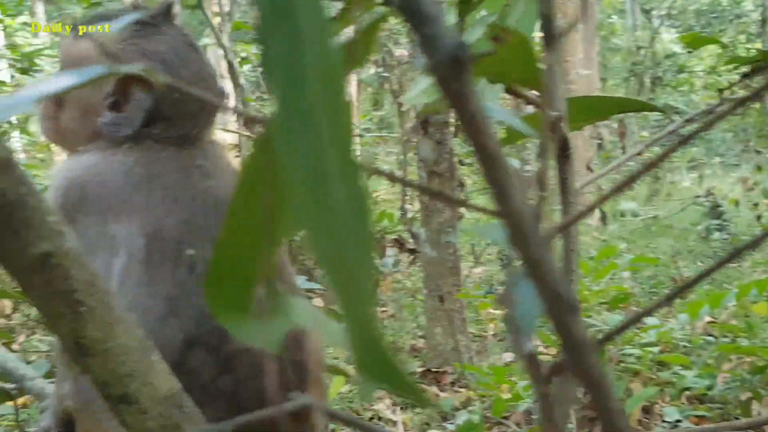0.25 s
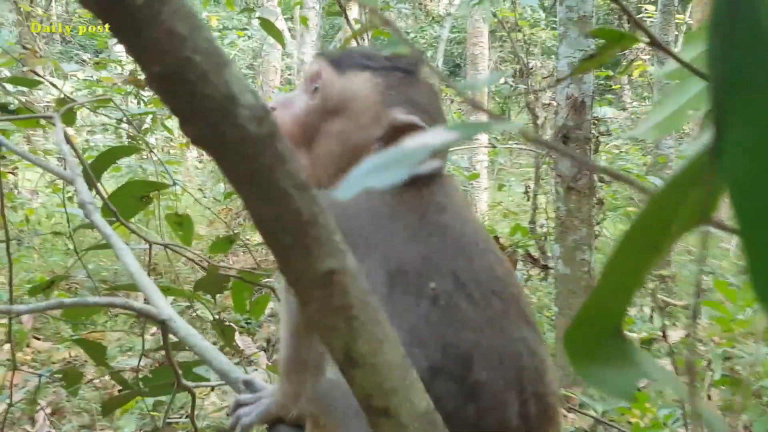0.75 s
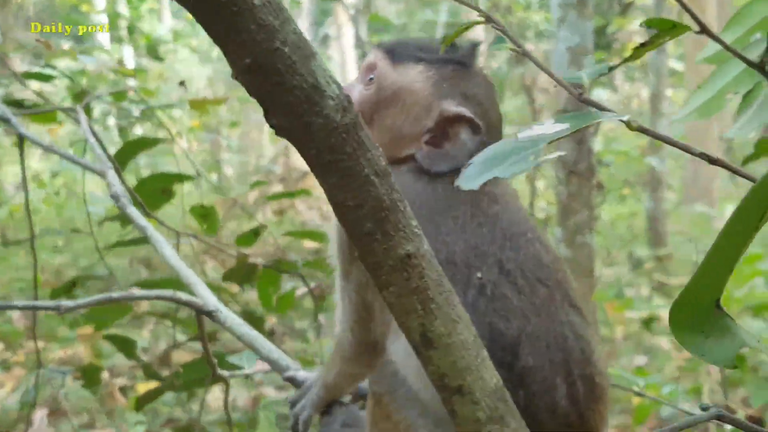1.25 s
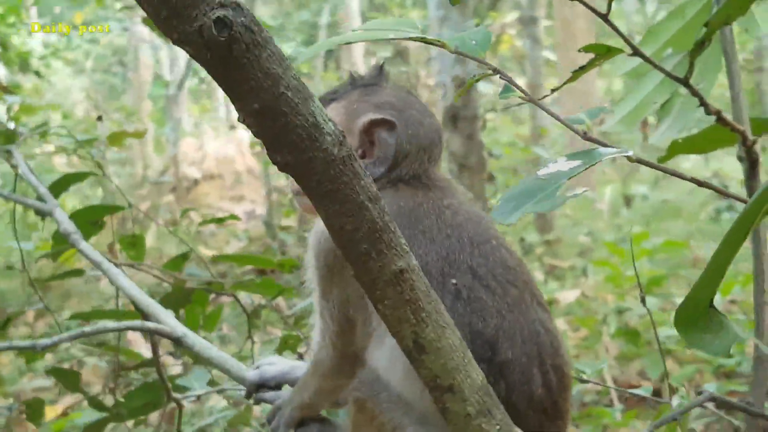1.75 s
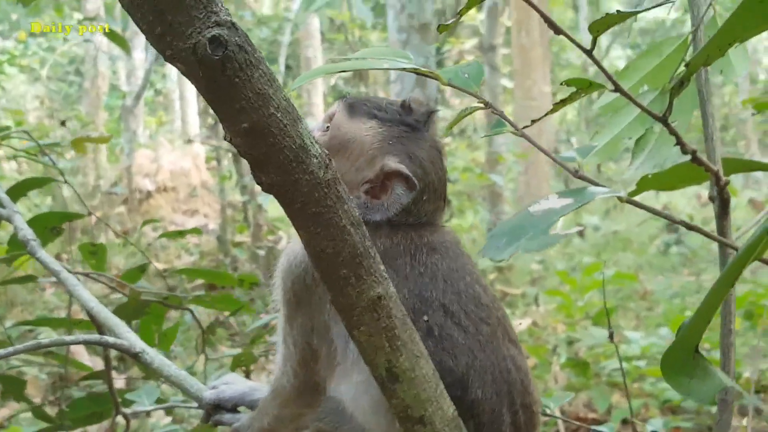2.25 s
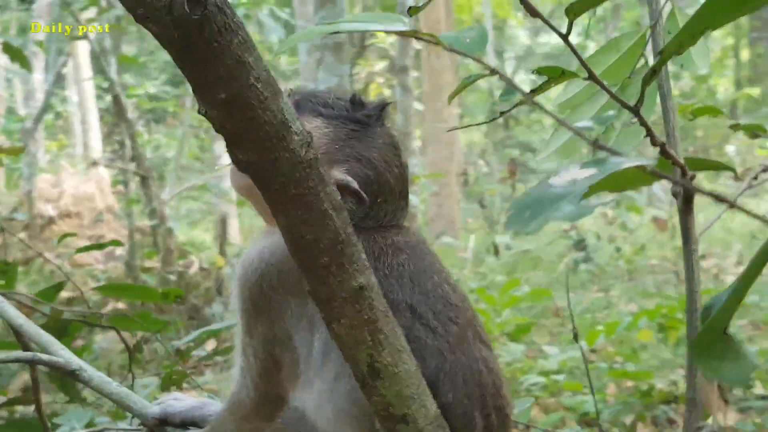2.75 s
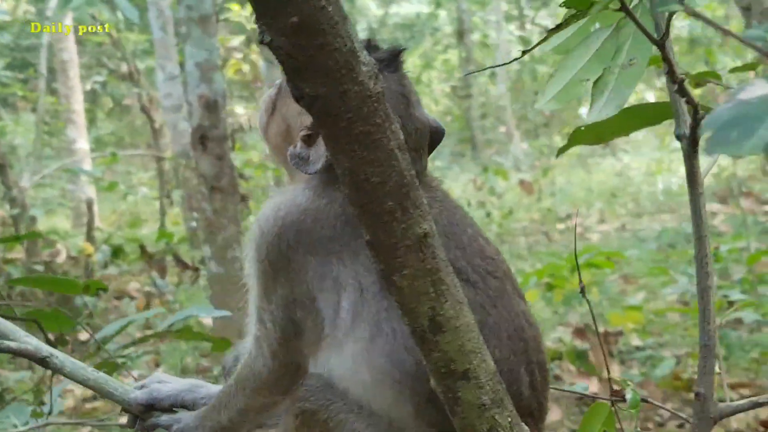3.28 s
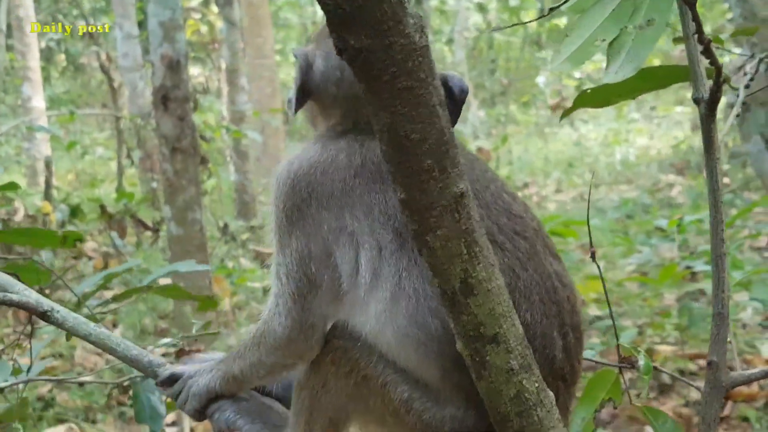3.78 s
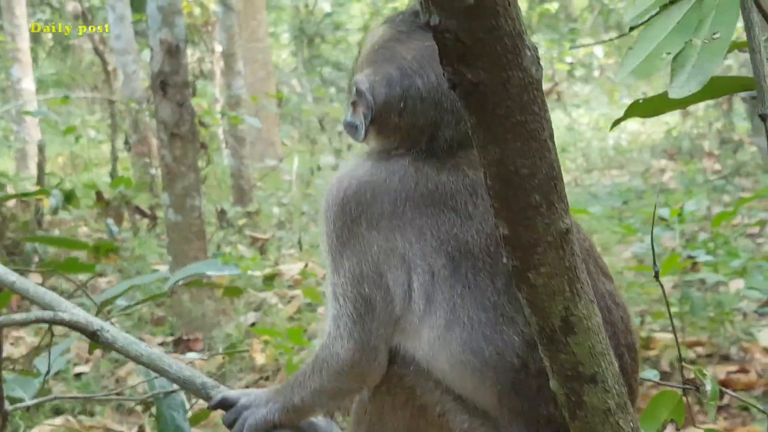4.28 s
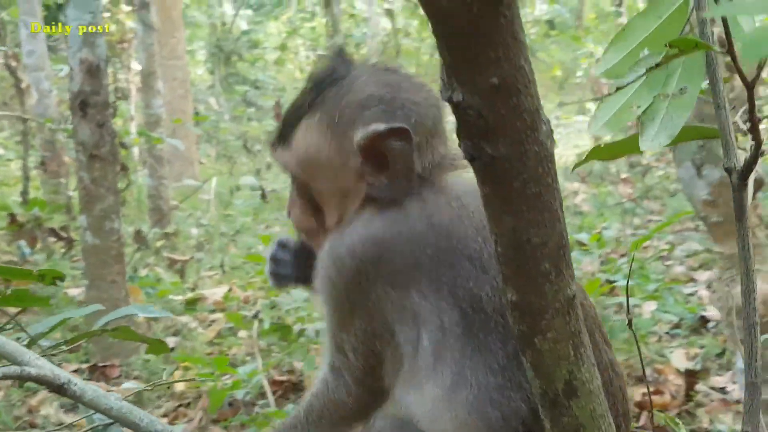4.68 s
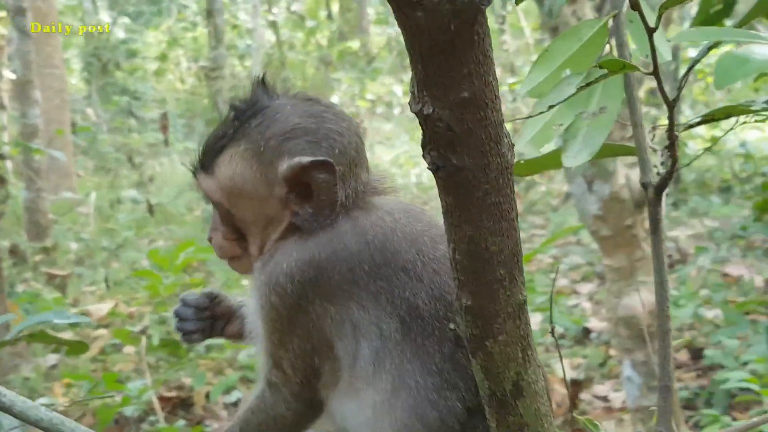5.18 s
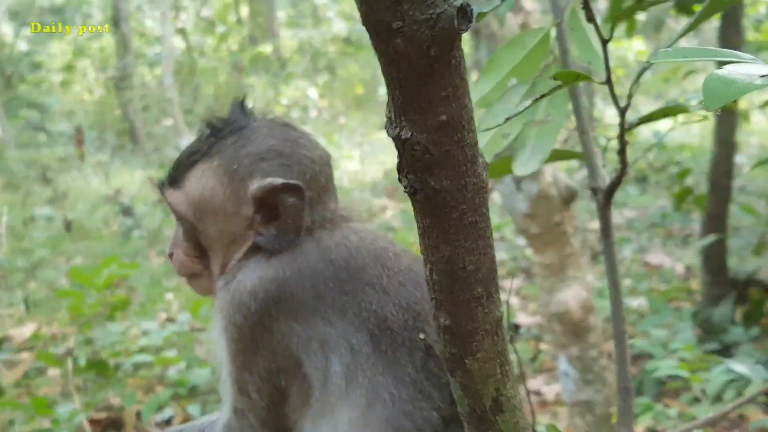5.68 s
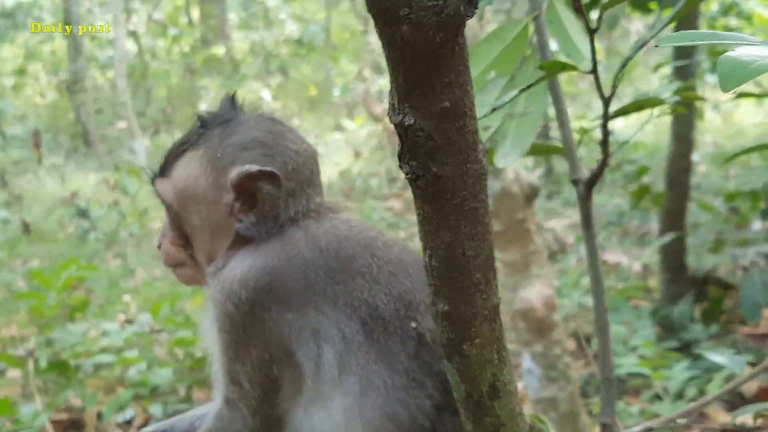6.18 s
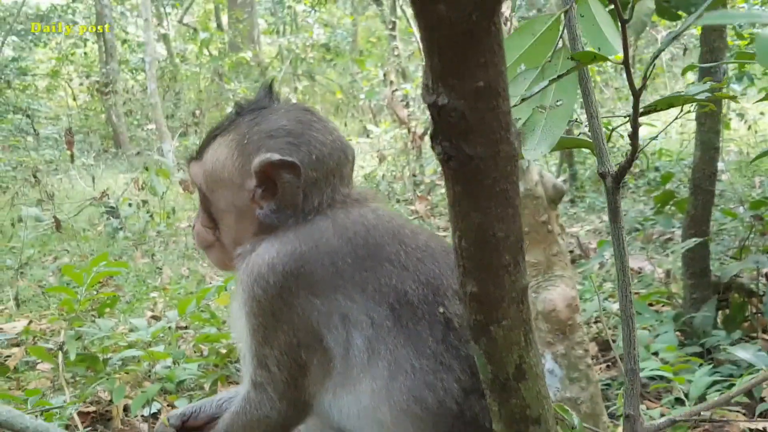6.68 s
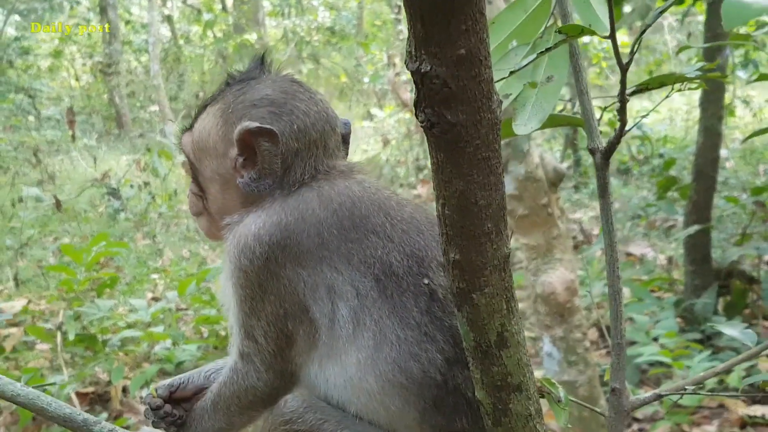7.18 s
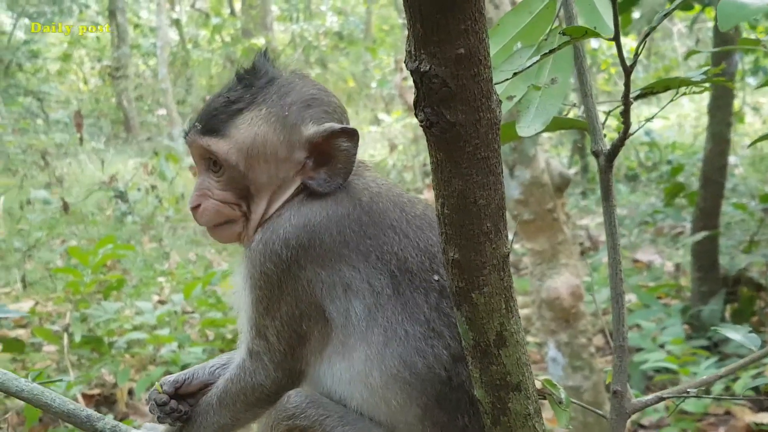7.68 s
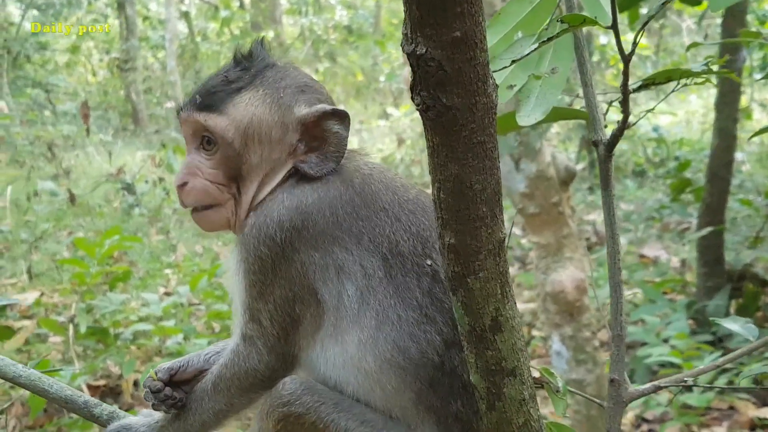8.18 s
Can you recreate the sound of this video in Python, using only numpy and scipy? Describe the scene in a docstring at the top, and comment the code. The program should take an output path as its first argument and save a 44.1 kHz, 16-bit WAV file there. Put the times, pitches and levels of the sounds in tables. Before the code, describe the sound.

Outdoors in woodland where a young monkey sits quietly, a continuous shrill insect whine dominates. Small dry leaf scuffs and ticks come close to the microphone in clusters, growing busiest around four seconds, when a twig breaks with a sharp bright crack and tiny woody knock. Afterwards the litter quietens to a few soft crackles. Low far rumble and thin airy hiss sit underneath; the monkey makes no call.

```python
"""A chorus of cicadas whines in a forest canopy around a small hand-held camera with two sound ports.
Each buckle of their drums gives five clicks, so every fifth overtone is strong; trunks scatter the song.
A far low rumble and a faint hiss of air are shaped noise. Dry leaves rustle close by as dense random
clicks and crack as short damped rings; once, a twig snaps with a bright burst and a woody knock."""
import sys
import numpy as np
from scipy import signal
from scipy.fft import rfft, irfft, next_fast_len
from scipy.io import wavfile
from scipy.ndimage import uniform_filter1d

SR = 44100
rng = np.random.default_rng(int(sys.argv[2]) if len(sys.argv) > 2 else 0)


def generate_wav(sig):
    """Save sig (samples, or channels by samples) to the path in sys.argv[1] as 16-bit PCM at SR."""
    pcm = np.round(np.clip(np.atleast_2d(sig).T, -1, 1) * 32767).astype(np.int16)
    wavfile.write(sys.argv[1], SR, pcm)


N = 372644


def undb(db):
    """Decibel law: amplitude gain of a level in dB."""
    return 10 ** (np.asarray(db) / 20)


def unit(x):
    """Power normalization: scale to rms 1."""
    return x / np.sqrt(np.mean(x ** 2))


def colour(x, points, scale=1):
    """Linear filtering: a gain curve through (Hz, dB) points joined on a log frequency axis."""
    size = next_fast_len(x.shape[-1])
    hz, db = np.transpose(points)
    bin_hz = np.arange(size // 2 + 1) * SR / size
    log_hz = np.log(np.maximum(bin_hz, 1))
    gain = undb(scale * np.interp(log_hz, np.log(hz), db))
    return irfft(rfft(x, size) * gain, size)[..., :x.shape[-1]]


def curves(table):
    """Linear interpolation: each column of a timed table, one value a sample."""
    time_s, *columns = np.transpose(table)
    return [np.interp(np.arange(N) / SR, time_s, column) for column in columns]


def walk(rate_hz, size=N):
    """Low-passed chance: a smooth random curve of rms 1 that turns about rate_hz times a second."""
    width = max(int(SR / rate_hz), 2)
    smooth = uniform_filter1d(rng.standard_normal(size), width)
    return unit(uniform_filter1d(smooth, width))


def scatter(x, t60_s, pair):
    """Diffuse scattering: echoes form an exponentially fading noise tail, separate for each port."""
    t = np.arange(pair.shape[1]) / SR
    tail = pair * np.exp(-np.log(1000) * t / t60_s)
    energy = np.sum(tail[0] ** 2)
    return signal.fftconvolve(x[None], tail / np.sqrt(energy), axes=1)


BUCKLE_HZ = 542.3
# Overtones of the buckling drums; half multiples come from the two drums taking turns.
# Columns: multiple [of BUCKLE_HZ], level_db [dB]
OVERTONES = [(3, -89), (4, -64.5), (4.5, -81), (5, -36.5), (5.5, -60.5), (6, -58.5), (6.5, -70.5), (7, -69),
             (8, -66), (9, -61), (10, -36.5), (11, -55), (11.5, -65), (12, -61), (12.5, -70), (13, -61.5),
             (14, -58), (14.5, -57), (15, -42.5), (16, -58), (16.5, -71), (17, -61), (17.5, -80),
             (18, -66.5), (19, -56), (19.5, -60), (20, -42), (21, -57), (21.5, -70), (22, -60), (22.5, -70),
             (23, -60.5), (24, -66), (25, -55), (26, -70), (27, -64), (28, -67), (29, -72)]
# The chorus as the camera turns.
# Columns: time_s [s], level_db [dB], lowest_ring_db [dB], left_minus_right_db [dB], raggedness_db [dB]
CHORUS_COURSE = [(0, -0.5, 0.5, -0.5, -0.5), (1.2, -0.5, 0.5, 2.5, -1), (2.5, -0.5, 1, 1, 1),
                 (3.6, -1.5, 1.5, 0.5, 1.5), (4.8, -2, 1, -0.5, 2.5), (6, -1.5, 2, 0.5, 2.5),
                 (7, -2, -0.5, 0.5, 4.5), (8.45, -2.5, 0, 1.5, 4)]


def cicadas(count=10):
    """Harmonic synthesis with phase modulation: detuned singers waver, flutter and slip between buckles."""
    lead = SR // 2  # half a second of song beforehand, so echoes are already running at the start
    size = N + lead
    turn = np.linspace(0, 2, 4097)  # two buckles make one full period of the half multiples
    choir, power = 0, 0
    level_db, low_db, pan_db, ragged_db = curves(CHORUS_COURSE)
    ragged = np.pad(undb(ragged_db), (lead, 0), "edge")
    for place in np.linspace(-1, 1, count):
        shape = sum(undb(db) * np.sin(2 * np.pi * (k * turn + rng.random())) for k, db in OVERTONES)
        # singers far from the common pitch are faint
        near = undb(-14 * abs(place))
        tune = 1 + .011 * place + .003 * place ** 2 + .003 * walk(15, size)
        slip = ragged * walk(612, size)
        # phase counts buckles
        phase = np.cumsum(BUCKLE_HZ * tune) / SR
        phase += 0.0022 * slip + 0.0013 * walk(220, size)
        # a buckle that drags is flatter and louder, which fills the low side of each line
        push = 1 - 0.078 * unit(np.gradient(slip))
        push += 0.28 * ragged * walk(425, size) + 0.28 * walk(53, size)
        song = near * push * np.interp(phase % 2, turn, shape)
        # every singer sits on its own tree, so its echoes are its own
        echoes = scatter(song, 0.66, rng.standard_normal((2, lead)))
        choir = choir + echoes[:, lead:size]
        power += near ** 2
    choir = choir * np.sqrt(2 / power)
    lowest_ring = colour(choir, [(3600, 0), (4400, -80)])
    balanced = choir + (undb(low_db) - 1) * lowest_ring
    return balanced * undb(level_db + np.array([pan_db, -pan_db]) / 2)


# Spectrum of the far rumble and hiss. Columns: frequency_hz [Hz], density_db [dB per Hz, relative]
AIR_SPECTRUM = [(15, -34), (32, -4), (45, -1), (55, 0), (146, -6.5), (250, -18), (330, -18), (700, -20.5),
                (1300, -31), (1700, -19.5), (2000, -29), (4000, -31), (9000, -65), (16000, -58)]
# Stereo width of the air. Columns: frequency_hz [Hz], side_minus_mid_db [dB]
AIR_WIDTH = [(60, -19), (110, -18.5), (200, -7), (380, -5.5), (700, -1.5), (1290, 6), (2380, -2),
             (4400, -1), (8120, -21), (15000, -16)]
AIR_DB = -52.5  # rms over both ports, before the camera body shades them


def air():
    """Partial coherence: shared mid and opposed side noise make rumble and hiss; the bass is nearly mono."""
    mid, side = rng.standard_normal((2, N))
    side = colour(side, AIR_WIDTH)
    ports = np.array([mid + side, mid - side])
    return unit(colour(ports, AIR_SPECTRUM)) * undb(AIR_DB)


# Leaves on the move. Columns: start_s [s], hold_s [s], level_db [dB]
RUSTLE_EVENTS = [(0.254, 0.033, -55), (0.367, 0.063, -52.5), (0.5, 0.026, -47.5), (.59, 0.044, -51),
                 (0.671, 0.076, -42.5), (.78, 0.095, -46), (.92, .06, -55), (1.255, 0.13, -59),
                 (2.015, 0.17, -53), (2.552, .03, -49), (2.613, 0.059, -40.5), (2.714, 0.042, -43.5),
                 (2.81, 0.058, -42.5), (2.9, .04, -48), (3.035, 0.064, -52.5), (3.2, 0.057, -52.5),
                 (3.28, 0.099, -48.5), (3.498, 0.013, -49), (3.648, 0.085, -55.5), (3.89, 0.067, -50),
                 (4.006, 0.099, -51.5), (4.13, 0.038, -45.5), (4.202, 0.046, -40.5), (4.28, 0.018, -42),
                 (4.341, 0.025, -38), (4.435, 0.016, -41.5), (4.47, 0.058, -48), (4.56, 0.054, -54),
                 (4.787, 0.14, -52), (5.14, .05, -55), (6.043, 0.038, -53), (6.165, 0.13, -48.5),
                 (6.338, 0.067, -53.5), (6.526, 0.017, -51.5)]
RISE_DB_PER_S, FALL_DB_PER_S = 292, 450
STIR_DB = -63  # the litter never rests fully


def motion():
    """Incoherent addition: rustles swell, hold and fade evenly in dB, and their powers add."""
    t = np.arange(N) / SR
    power = undb(STIR_DB) ** 2
    for start_s, hold_s, level_db in RUSTLE_EVENTS:
        rise_db = RISE_DB_PER_S * np.maximum(start_s - t, 0)
        fall_db = FALL_DB_PER_S * np.maximum(t - start_s - hold_s, 0)
        power = power + undb(level_db - rise_db - fall_db) ** 2
    return np.sqrt(power)


# Spectrum of dry leaves. Columns: frequency_hz [Hz], density_db [dB per Hz, relative]
LEAF_SPECTRUM = [(150, -13), (300, -10), (600, -4), (1050, -1), (1600, 0), (2300, -2), (4400, -6.5),
                 (8000, -1.5), (15000, -35)]
# Single leaf cracks. Columns: start_s [s], level_db [dB], ring_hz [Hz], treble_db [dB relative to level_db]
LEAF_CRACKS = [(0.018, -38, 1900, -6), (0.427, -38, 1210, -18), (0.498, -40, 970, -20),
               (0.654, -34, 1670, -10), (.8, -46, 2000, 14), (0.811, -28, 1170, -17),
               (1.021, -46, 1410, -18), (2.022, -37.5, 1530, -19), (2.594, -34.5, 1590, -17),
               (2.633, -29, 1570, -17), (2.811, -35, 1690, -21), (2.837, -31, 1580, -7),
               (2.868, -30, 1270, -23), (3.022, -34.5, 1640, -21), (3.093, -37.5, 920, -15),
               (3.226, -40, 1500, -20), (3.297, -33, 1700, -24), (3.439, -36, 1780, -19),
               (4.201, -33, 1550, -19), (4.235, -33, 1480, -19), (4.248, -27, 1810, -21),
               (4.287, -35, 1690, -20), (4.343, -25, 1690, -10.5), (4.363, -31, 1160, -22),
               (4.424, -30, 1570, -28), (4.88, -39, 1630, -18), (5.41, -48, 1490, -18),
               (6.236, -38, 1210, -18), (6.26, -31, 1640, -22), (6.434, -35, 1720, -27),
               (6.722, -39.5, 1780, -23), (6.748, -40, 1800, -16), (6.919, -48, 1200, -18),
               (7.346, -41, 999, -17)]


def leaves():
    """Shot noise and damped resonance: each leaf size clicks in its own range over hiss; cracks ring."""
    near = 0
    for hz in (200, 400, 800, 1600, 3200, 6400, 12800):
        hits = rng.random(N) < 1800 / SR  # 1800 clicks a second on average
        strength = undb(1.7 * np.minimum(rng.exponential(size=N), 3))
        grains = hits * rng.standard_normal(N) * strength
        hiss = 0.76 * rng.standard_normal(N)
        clicks = (unit(grains) + hiss) * undb(3.3 * walk(44))
        band = [(hz / 3, -40), (hz / 1.8, -9), (hz / 1.41, -3), (hz, 0),
                (hz * 1.41, -3), (hz * 1.8, -9), (hz * 3, -40)]
        near = near + colour(clicks, band)
    near = unit(colour(near, LEAF_SPECTRUM)) * motion()
    t = np.arange(1024) / SR
    noises = rng.standard_normal((len(LEAF_CRACKS), len(t)))
    for (start_s, level_db, ring_hz, treble_db), noise in zip(LEAF_CRACKS, noises):
        ring = np.sin(2 * np.pi * ring_hz * t) * np.exp(-t / 0.0055) * np.tanh(t / 0.0006)
        rasp = unit(colour(noise, LEAF_SPECTRUM)) * np.exp(-t / 0.0051)
        tick = unit(colour(noise, [(2500, -35), (3400, -9), (5000, 13), (9000, -22)]))
        tick = tick * np.exp(-t / 0.0066)
        crack = .5 * ring + .5 * rasp + undb(treble_db) * tick
        start = int(start_s * SR)
        near[start:start + len(t)] += undb(level_db) * crack
    return near


# The breaks of one snapping twig. Columns: start_s [s], level_db [dB], treble_db [dB relative to level_db]
TWIG_SNAPS = [(4.3338, -15, -1.5), (4.3357, -15, -10)]


def twig():
    """Impulsive fracture: a bright noise burst with a short knock of two damped modes."""
    out, t = np.zeros(N), np.arange(2048) / SR
    noises = rng.standard_normal((len(TWIG_SNAPS), len(t)))
    for (start_s, level_db, treble_db), noise in zip(TWIG_SNAPS, noises):
        bright = unit(colour(noise, [(2000, -3), (8000, -11), (12000, 10), (16000, -15)]))
        bright = bright * np.exp(-t / 0.00099)
        knock = np.sin(2 * np.pi * 900 * t) * np.exp(-t / 0.00055)
        knock += np.sin(2 * np.pi * 2500 * t) * np.exp(-t / 0.0017)
        start = int(start_s * SR)
        out[start:start + len(t)] += undb(level_db) * (undb(treble_db) * 0.8 * bright + 0.22 * knock)
    return out


def scene():
    """Superposition: near sounds reach the left port first, with a short scatter from the undergrowth."""
    near = leaves() + twig()
    direct = np.array([near, np.roll(near, 3)])  # right port three samples later
    undergrowth = scatter(near, 0.15, rng.standard_normal((2, SR)))[:, :N]
    return cicadas() + air() + direct + undb(-11) * undergrowth


# Shading of the two ports by the camera body. Columns: frequency_hz [Hz], left_minus_right_db [dB]
PORT_SHADING = [(900, 0), (1600, -5), (2400, 2.5), (5400, 1.5), (8100, 2.5), (10800, -2), (15000, 1.5)]
TOP_HZ = 15740  # edge of the steep treble cut


def record(dry):
    """Diffraction and band limiting: the camera body shades the two ports differently; the top is cut."""
    left = colour(dry[0], PORT_SHADING, .5)
    right = colour(dry[1], PORT_SHADING, -.5)
    top_cut = signal.ellip(10, .1, 50, TOP_HZ, fs=SR, output="sos")
    return signal.sosfiltfilt(top_cut, np.array([left, right]))


dry = scene()
out = record(dry)
generate_wav(out)
```